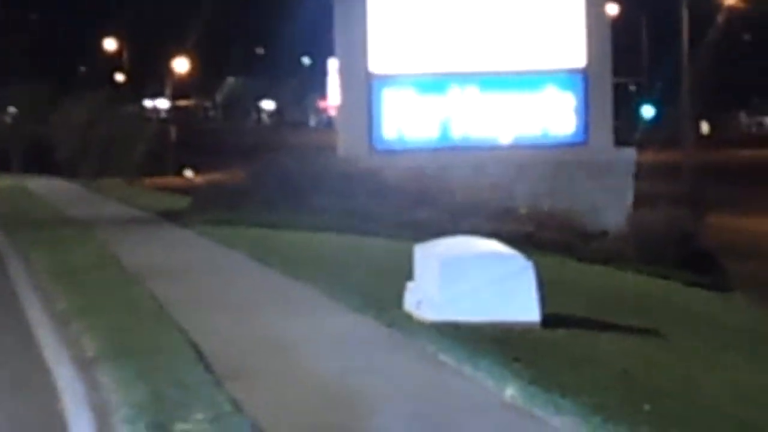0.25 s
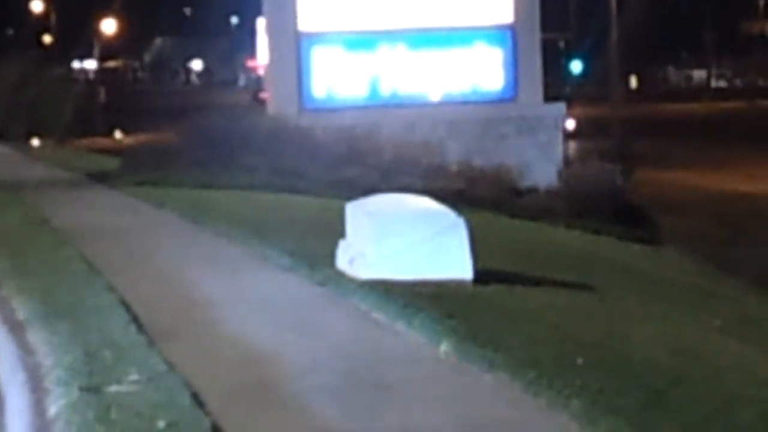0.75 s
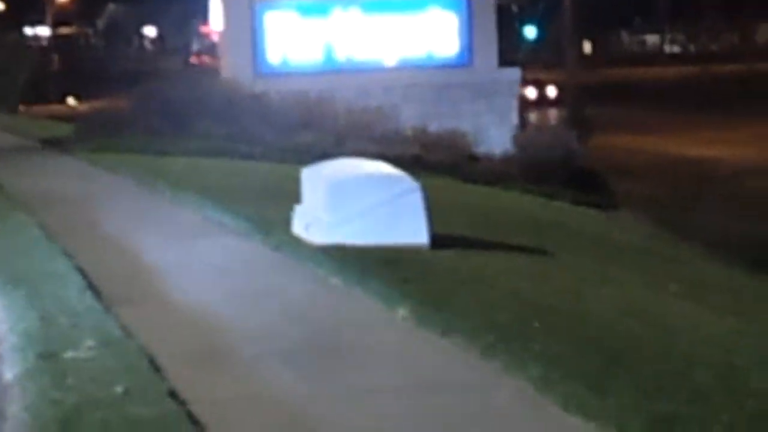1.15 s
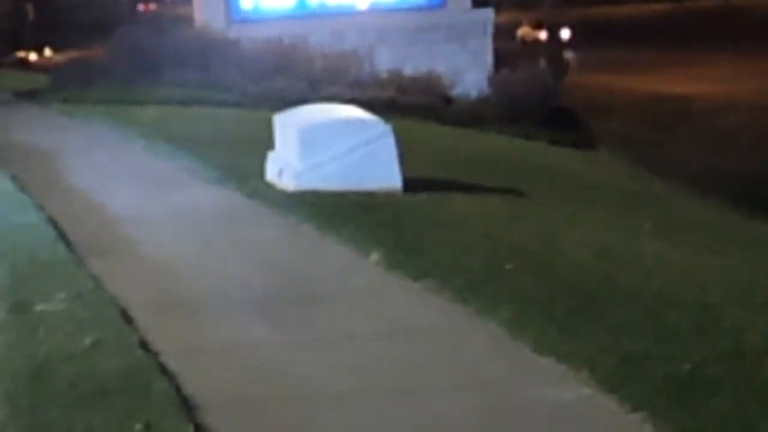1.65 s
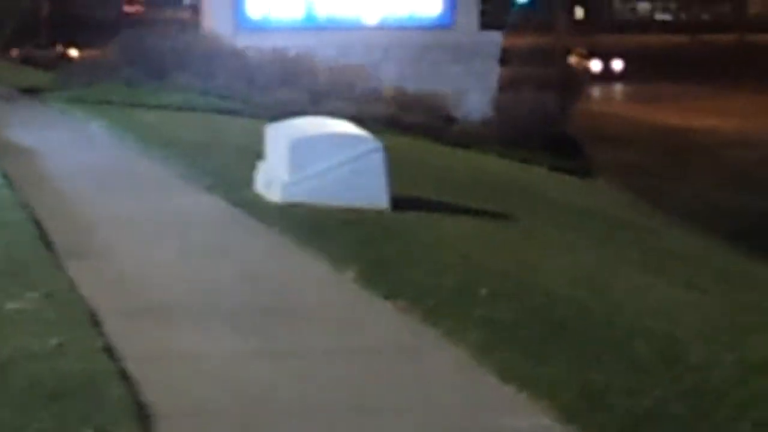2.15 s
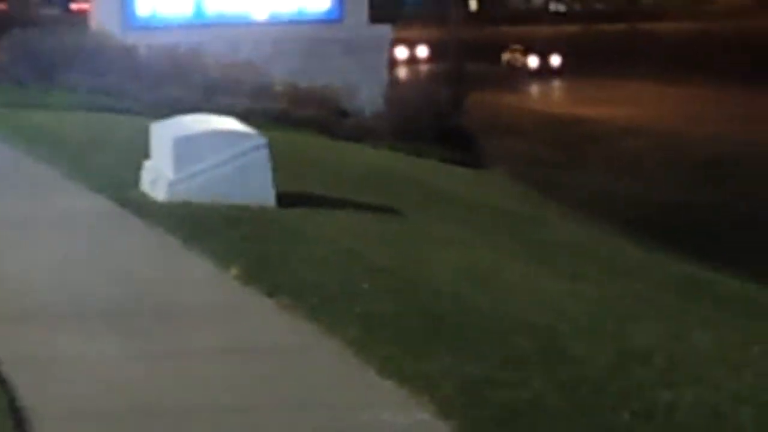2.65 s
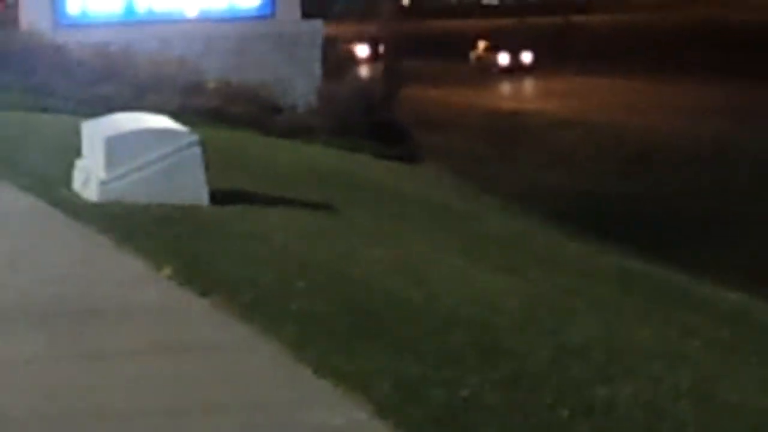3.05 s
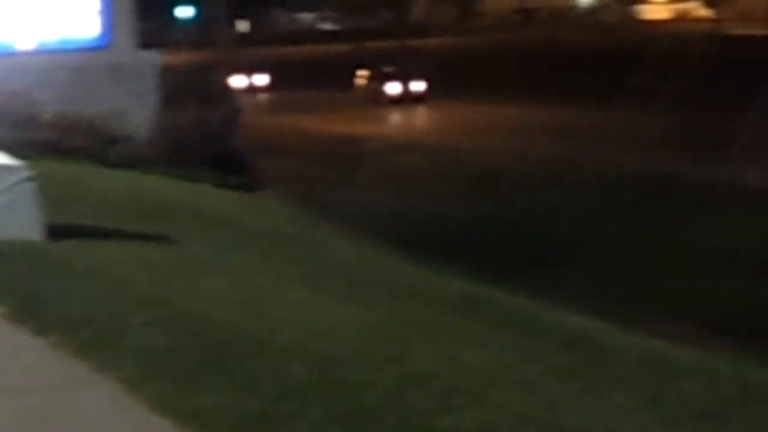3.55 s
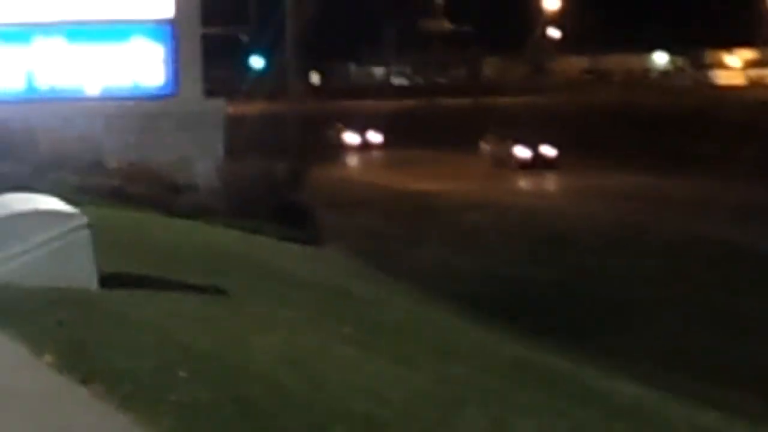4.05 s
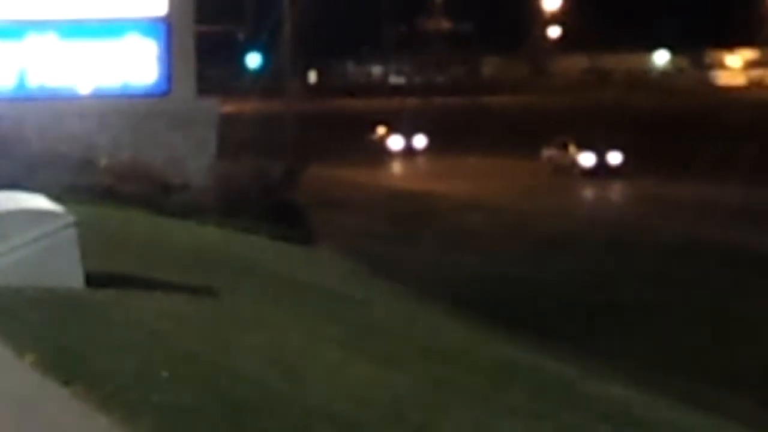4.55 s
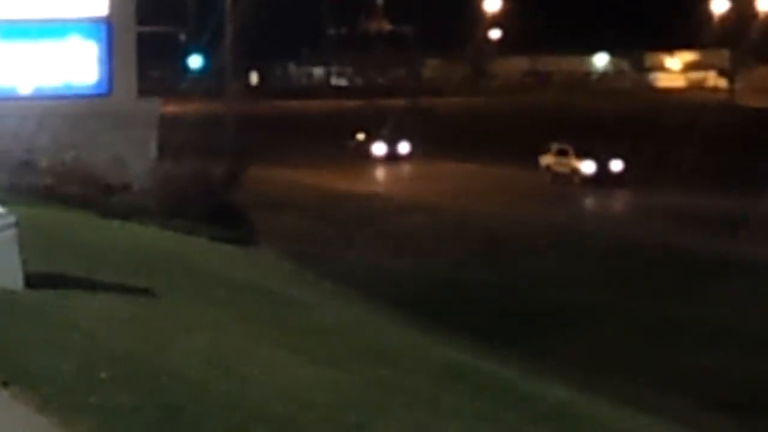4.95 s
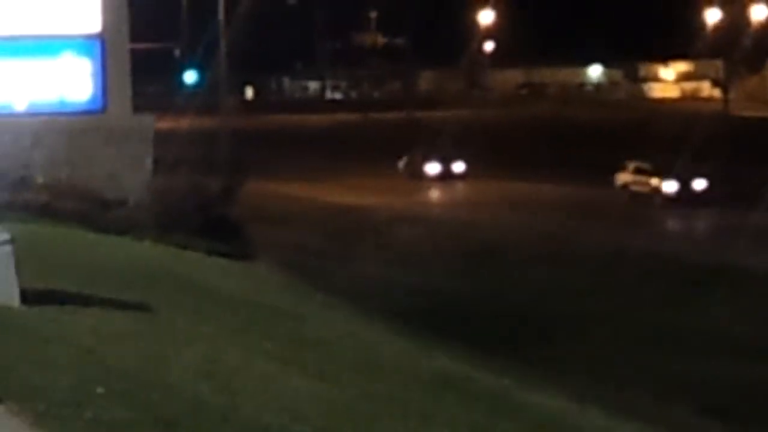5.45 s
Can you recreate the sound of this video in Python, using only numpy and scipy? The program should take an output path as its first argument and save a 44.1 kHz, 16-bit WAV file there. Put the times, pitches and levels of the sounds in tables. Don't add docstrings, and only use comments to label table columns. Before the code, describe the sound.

A suburban grassy roadside at night, heard in mono through a small handheld recorder. From 0 to 1 s, wind hits the microphone in abrupt slaps and deep thumps, while a low engine throb is already approaching. The engine stays near idle, with fast, uneven exhaust pulses at about eighty per second; it swells to a heavy boom at 2.1 s, fuller body at 2.3 s and a rough bark around 2.5 s, pushing the bass into overload. Tyre roar and bright hiss peak with it, then fall away. Small dry scuffs in grass occur near 0.7-0.9, 1.5, 2.4-2.7 and 3.6 s. After 3 s the throb recedes, sagging slightly in pitch at the end. Cricket trills and short chirps emerge, especially after 4.8 s. Smooth far traffic continues throughout, and from about 4 s a distant car adds a faint whine and then a low drone.

```python
import sys
import numpy as np
from scipy import signal
from scipy.io import wavfile
from scipy.ndimage import uniform_filter1d

SR = 44100
rng = np.random.default_rng(int(sys.argv[2]) if len(sys.argv) > 2 else 0)


def rack_gain(trim_db):
    fader = np.asarray(trim_db, float)
    return 10 ** (fader / 20)


def unload_audio(sound):
    columns = np.transpose(np.atleast_2d(sound))
    steps = np.round(np.clip(columns, -1, 1) * 32767)
    wavfile.write(sys.argv[1], SR, steps.astype(np.int16))


N = 251370
T = np.arange(N) / SR


def rms_one(x):
    return x / np.sqrt(np.mean(x ** 2) + 1e-20)


def in_time(rows):
    start_s, *columns = np.transpose(rows)
    return [np.interp(T, start_s, column) for column in columns]


def drift(turns_per_s):
    r = np.exp(-80 * np.pi * turns_per_s / SR)
    slow = signal.lfilter([1], [1, -2 * r, r * r], rng.standard_normal(N // 40 + 2002))[2000:]
    return np.interp(np.arange(N) / 40, np.arange(len(slow)), rms_one(slow))


def swell(start_s, rise_s, hold_s, fade_s, level_db):
    corners = np.cumsum([start_s, rise_s, hold_s, fade_s])
    return rack_gain(level_db) * np.interp(T, corners, [0, 1, 1, 0]) ** 2


def band(x, low_hz, high_hz, order=2):
    edges = [low_hz, min(high_hz, .45 * SR)]
    return signal.sosfilt(signal.butter(order, edges, "band", fs=SR, output="sos"), x)


def band_noise(low_hz, high_hz):
    return rms_one(band(rng.standard_normal(N), low_hz, high_hz))


def coloured(spectrum, patchy_db):
    hz, level_db = np.transpose(spectrum)
    bands = int(3 * np.log2(hz[-1] / hz[0])) + 1
    edges = hz[0] * 2 ** (np.arange(bands + 1) / 3)
    white = rng.standard_normal((2, N))
    out = np.zeros(N)
    for k, (low, high) in enumerate(zip(edges, edges[1:])):
        centre_db = np.interp(np.log(low * high) / 2, np.log(hz), level_db)
        out += rack_gain(centre_db + patchy_db * drift(3.16)) * band(white[k % 2], low, high)
    return rms_one(out)


# start_s [s], speed_hz [engine cycles per s]
ENGINE_SPEED = [(0, 9.818), (.91, 9.935), (1.04, 10.164), (1.68, 9.984), (1.96, 10.216), (2.31, 9.924),
                (2.55, 10.093), (3.01, 9.856), (3.39, 10.058), (3.7, 9.863), (4.08, 10.191), (4.46, 9.916),
                (4.71, 10.184), (5.09, 9.772), (5.7, 8.831)]


def engine_speed():
    return in_time(ENGINE_SPEED)[0]


# loudest_s [s], level_db [dB], coming_s, going_s [s per kerb distance]
PASS = [
    (2.1, -12.5, 0.52, 0.49),
    (2.3, -12.5, 0.73, 0.94),
    (2.55, -22.5, 0.54, .6),
]


def passing():
    idle_hz = 9.95
    sag_loss_db_per_hz = (-3.0, 2.5, 12)
    sag_hz = np.maximum(idle_hz - engine_speed(), 0) * (T > PASS[-1][0] + 2)
    gains = []
    for (loudest_s, level_db, coming_s, going_s), loss_db in zip(PASS, sag_loss_db_per_hz):
        along = (T - loudest_s) / np.where(T < loudest_s, coming_s, going_s)
        gains.append(rack_gain(level_db - loss_db * sag_hz) / np.hypot(1, along))
    return gains


CYLINDER_PUSH = [.72, 1.05, .85, .79, .73, .61, .41, 1.17]
VALVE_CRACK = [.66, .87, .70, .76, .52, 1.22, 1.15, .64]


def order_phase(order):
    push, crack = np.angle(np.fft.fft([CYLINDER_PUSH, VALVE_CRACK]))
    if order > 18 and order != 20:
        return crack[int(order) % 8] + .25 + .264 * order
    u = np.log(order / 10)
    return push[int(order) % 8] + 20.44 + 25.93 * u + 12.45 * u * u


# order [multiple of the engine cycle], level_db [dB]
ORDERS = [(1, -32), (2, -26), (3, -26), (4, -19), (5, 0), (6, -21), (7, -19), (8, -3.5), (9, -14.5),
          (10, -21), (11, -11.5), (12, -11.5), (13, -12.5), (14, -21), (15, -28), (16, -4), (17, -16),
          (18, -19), (19, -15), (20, -11), (21, -20), (22, -20), (23, -21), (24, -22)]
BARK_DB = [-17, -24, -26, -20, -27, -17, -27, -20]
# pitch_hz [Hz], level_db [dB per Hz]
GAS_FLOW = [(36, -7), (60, 2), (150, -3), (300, 1.5), (420, -18.5), (520, -26), (800, -20)]


def engine(wobble_db, rumble_db, throb):
    crank = 2 * np.pi * (np.cumsum(engine_speed()) / SR - .275)
    orders = list(ORDERS[1:])
    for order in range(25, 47):
        orders.append((order, BARK_DB[order % 8] - .25 * (order - 24) - 4 * (order >= 41)))
    parts = np.zeros((3, N))
    for order, level_db in orders:
        phase = order_phase(order)
        if level_db < -20.5:
            phase = rng.uniform(0, 2 * np.pi) + .5 * drift(1)
            level_db = level_db - 3
        part = int(order > 6) + int(order > 22)
        parts[part] += rack_gain(level_db + wobble_db * drift(4.1)) * np.cos(order * crank + phase)
    gains = passing()
    tones = sum(gain * rms_one(part) for gain, part in zip(gains, parts))
    puffs = 1 + throb * np.cos(8 * crank)
    return tones + rack_gain(rumble_db) * gains[1] * puffs * coloured(GAS_FLOW, patchy_db=2.0)


def ground_dip(x):
    dip_hz, dip_width_hz, dip_fills_s = 3300, 500, 1.0
    cut = signal.lfilter(*signal.iirpeak(dip_hz, dip_hz / dip_width_hz, fs=SR), x)
    return x - .75 * np.clip(4 * (dip_fills_s - T), 0, 1) * cut


# pitch_hz [Hz], level_db [dB per Hz]
TYRE_COLOUR = [(650, -38), (1100, 3), (1270, -1), (1580, -5), (2100, -3.5), (2850, -15.5), (3510, -12.5),
               (4600, -18.5), (5980, -24), (10100, -120)]
# start_s [s], level_db [dB]
TYRE_LEVEL = [
    (0, -38),
    (.3, -36),
    (2.05, -34.5),
    (2.76, -36),
    (3.5, -41.5),
    (4.2, -44.5),
    (5.7, -46.5),
]
# pitch_hz [Hz], level_db [dB per Hz]
AIR_COLOUR = [(2400, -1), (3300, -6.5), (3900, -9), (4400, -12.5), (5000, -2.5), (6200, -10.5),
              (7000, -11.5), (8200, -12.5), (9500, -12.5), (12000, -15.5)]


def tyres():
    level_db = in_time(TYRE_LEVEL)[0]
    roar = rack_gain(level_db + 2.5) * coloured(TYRE_COLOUR, patchy_db=0.92)
    night_air_db, spray_db = -59.5, -53 + 1.86 * (level_db + 35.5)
    air = np.hypot(rack_gain(night_air_db), rack_gain(spray_db))
    return ground_dip(roar + rack_gain(8.0) * air * coloured(AIR_COLOUR, patchy_db=1.55))


# start_s [s, centre], half_s [s], rumble_db [dB], slap_db [dB]
GUSTS = [
    (0, 0.041, -10, -23.5),
    (0.196, 0.074, -24, -29.5),
    (0.319, 0.034, -13, -43),
    (.5, 0.031, -20, -51),
    (.65, 0.022, -32, -33),
    (0.743, 0.026, -16.5, -43),
    (0.85, .05, -20, -53),
    (1.015, .06, -25, -40),
    (2.348, 0.11, -23, -49),
    (3.32, .08, -19, -61),
]
# [dB, peak]
PUFFS = [(.003, 0.0044, -2.5), (0.031, 0.0027, 4), (0.173, 0.0025, 0), (0.21, 0.0014, -5.5),
         (0.254, 0.0018, -4.5), (0.309, 0.007, 0.5), (0.333, 0.0072, -11), (.347, 0.0019, 2),
         (0.396, 0.0025, -7.5), (0.638, 0.0076, -5.5), (0.749, 0.0067, -7.5), (0.758, 0.004, -1.5),
         (.806, 0.0099, -12), (0.863, 0.012, -5), (0.99, 0.0087, -5), (1.010, 0.0017, -0.5)]


def wind():
    rumble, slap = (rack_gain(breeze_db - 2.5 * T) for breeze_db in (-23.5, -37))
    for centre_s, half_s, rumble_db, slap_db in GUSTS:
        gust = np.exp(-((T - centre_s) / half_s) ** 2)
        rumble = rumble + rack_gain(rumble_db) * gust
        slap = slap + rack_gain(slap_db) * gust
    out = rumble * eddies(38.6, 137, span_s=0.04) + slap * eddies(284, 483, span_s=0.011)
    for centre_s, length_s, level_db in PUFFS:
        u = (T - centre_s) / length_s
        lopsided = 1 + 0.59 * np.tanh(-4 * u)
        out -= rack_gain(level_db) * 1.38 * 2 * u * np.exp(-4 * u * u) * lopsided
    return out


def eddies(low_hz, high_hz, span_s):
    x = band(rng.standard_normal(N), low_hz, high_hz)
    return x / np.sqrt(uniform_filter1d(x ** 2, int(span_s * SR)) + 0.034 * np.mean(x ** 2))


# start_s [s], length_s [s], level_db [dB], low_hz [Hz], high_hz [Hz]
SCUFFS = [(0.686, 0.019, -36, 3500, 11800), (.948, 0.0088, -33.5, 3800, 5400),
          (0.944, 0.011, -41, 6000, 11800), (1.545, 0.027, -37, 2400, 3200), (2.481, 0.06, -40, 4500, 8800),
          (2.418, .025, -41, 3600, 4100), (2.494, 0.068, -34.5, 3200, 3930),
          (2.621, 0.17, -44, 5700, 10400), (2.631, 0.092, -32.5, 2000, 4400),
          (2.92, .006, -45, 7500, 10000), (3.611, 0.044, -37.5, 1600, 3440),
          (3.609, 0.018, -48, 6500, 14000)]


def scuffs(grain_db):
    out = np.zeros(N)
    for start_s, length_s, level_db, low_hz, high_hz in SCUFFS:
        i, n = int(start_s * SR), int(0.68 * length_s * SR)
        grains = rng.standard_normal(n)
        uneven_db = grain_db * np.repeat(rng.standard_normal(n), 90)[:n]
        t = np.arange(n)
        shape = np.minimum(t / 40, 1) * np.exp(-(t / (length_s * SR)) ** 4)
        out[i:i + n] += rack_gain(level_db) * shape * rms_one(band(grains * rack_gain(uneven_db), low_hz, high_hz))
    return out


def wing(pitch_hz, width_hz, strokes, duty, bend_hz, rough):
    part = np.clip(strokes % 1 / duty, 0, 1)
    turn = 2 * np.pi * np.cumsum(pitch_hz + bend_hz * (.2 - 2.5 * (part - .42) ** 2)) / SR
    r = np.exp(-np.pi * width_hz / SR)
    a, b = signal.lfilter([1], [1, -r], rng.standard_normal((2, len(strokes)))) * np.sqrt(1 - r * r)
    return np.sin(np.pi * part) * ((np.sqrt(2) + rough * a) * np.sin(turn) + rough * b * np.cos(turn))


# start_s [s], end_s [s], pitch_hz [Hz], level_db [dB]
CHIRPS = [(0.165, 0.564, 4880, -60), (0.756, 0.928, 4900, -50), (0.95, 1.212, 5270, -42),
          (1.004, 1.281, 4970, -42.5), (1.51, 1.7, 4900, -62), (2.395, 2.764, 5060, -47),
          (3.085, 3.407, 4860, -49), (3.194, 3.403, 5340, -61), (3.426, 3.67, 4880, -51),
          (3.7, 3.797, 4770, -66), (3.916, 4.25, 4880, -56), (4.1, 4.358, 4720, -53.5),
          (4.217, 4.5, 5200, -54), (4.532, 4.717, 4980, -60.5), (4.78, 5.195, 4800, -53),
          (4.85, 5.122, 4800, -63), (5.163, 5.456, 4910, -53), (5.358, 5.632, 5260, -54),
          (5.198, 5.703, 4910, -53.5)]


def insects():
    strokes = 17.33 * (T - 5.003)
    out = rack_gain(-53.5) * wing(5920, 200, strokes, duty=.55, bend_hz=560, rough=.6)
    answer = wing(5920, 200, .985 * strokes + .28, duty=.55, bend_hz=500, rough=.6)
    out += swell(3.35, .15, .9, .4, -56) * answer
    for start_s, end_s, pitch_hz, level_db in CHIRPS:
        i, j = int(start_s * SR), min(int(end_s * SR), N)
        t = T[:j - i]
        warming_hz = pitch_hz - 130 * np.exp(-t / .06)
        roll = wing(warming_hz, 70, 46.5 * t, duty=0.99, bend_hz=120, rough=.55)
        out[i:j] += rack_gain(level_db) * signal.windows.tukey(j - i, .12) * roll
    out += rack_gain(-57.5) * band_noise(4750, 5000)
    return out + swell(.45, .35, .7, .6, -53) * band_noise(8700, 10200)


# low_hz [Hz], high_hz [Hz], level_db [dB], late_s [s]
DISTANT_CAR = [
    (192, 236, -35, 0.59),
    (1360, 1620, -46, 0.093),
]


def distant_car():
    out = np.zeros(N)
    for low_hz, high_hz, level_db, late_s in DISTANT_CAR:
        out += swell(3.9 + late_s, 0.77, 0.6, 1.5, -0.5) * rack_gain(level_db) * band_noise(low_hz, high_hz)
    return out


# pitch_hz [Hz], level_db [dB per Hz]
FAR_COLOUR = [(240, -47), (400, -16), (464, -12), (624, -6), (769, -4), (960, -2), (1230, -4), (2000, -39),
              (2600, -40.5), (4400, -120)]
# start_s [s], level_db [dB]
FAR_LEVEL = [
    (0, -33.5),
    (.8, -30.5),
    (2.0, -29.5),
    (3.5, -30.5),
    (4.9, -31.5),
    (5.7, -35),
]


def far_traffic():
    hiss = band(coloured(FAR_COLOUR, patchy_db=0.4), 380, 1042, order=4)
    return rack_gain(in_time(FAR_LEVEL)[0] + 0.5) * hiss


def scene():
    motor = engine(wobble_db=.5, rumble_db=-15.5, throb=.3)
    nearby = tyres() + wind() + scuffs(grain_db=4.0)
    background = insects() + distant_car() + far_traffic()
    return (motor + nearby + background)[None]


def top_cut(x):
    return signal.sosfilt(signal.butter(12, 11830, fs=SR, output="sos"), x)


def record(dry):
    ceiling = .71
    held = dry / (1 + np.abs(dry / ceiling) ** 24) ** (1 / 24)
    return top_cut(held)


dry = scene()
out = record(dry)
unload_audio(out)
```